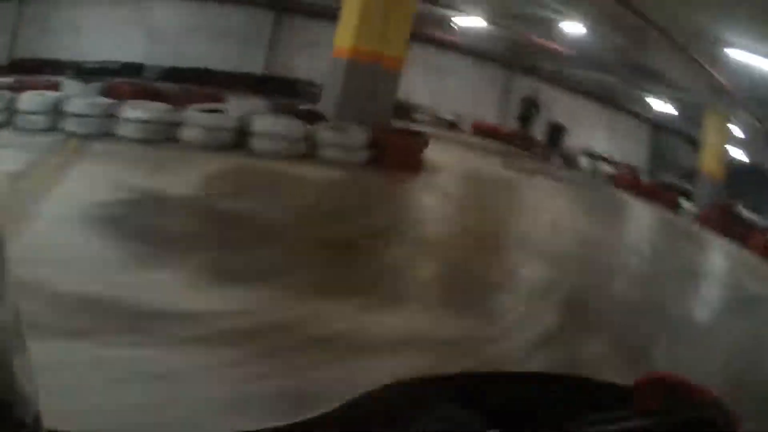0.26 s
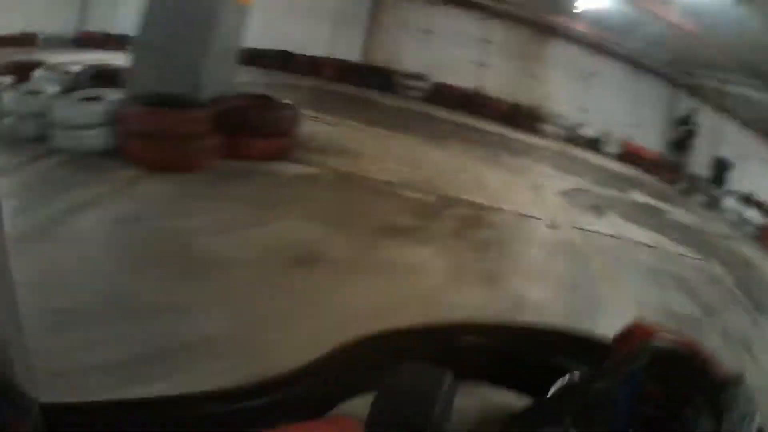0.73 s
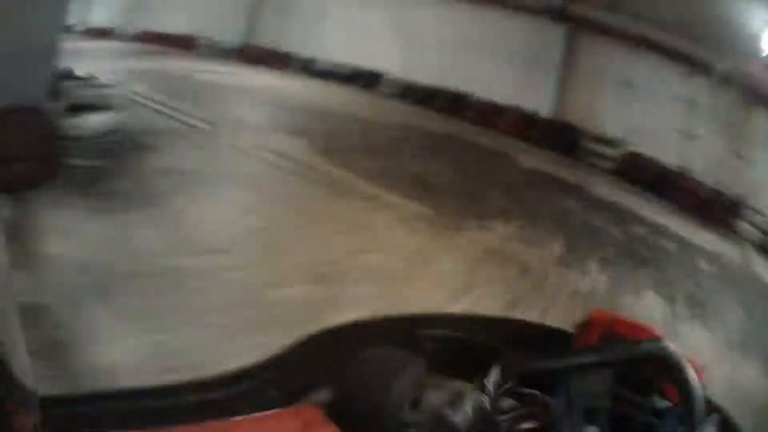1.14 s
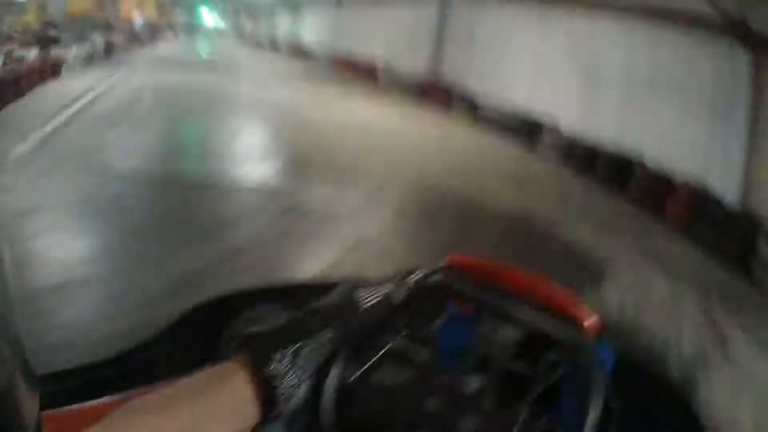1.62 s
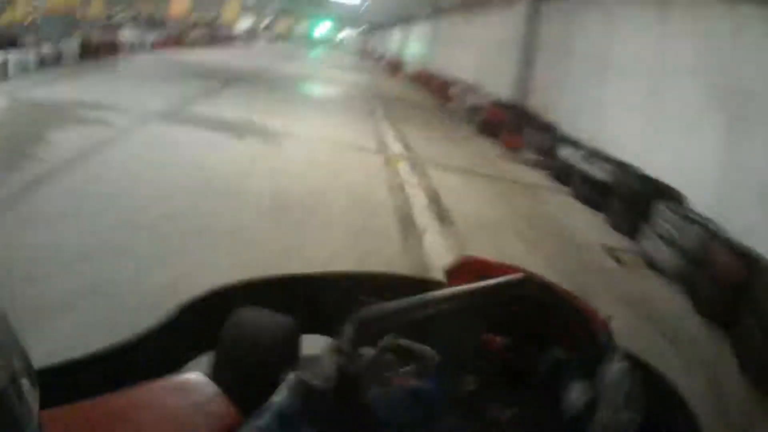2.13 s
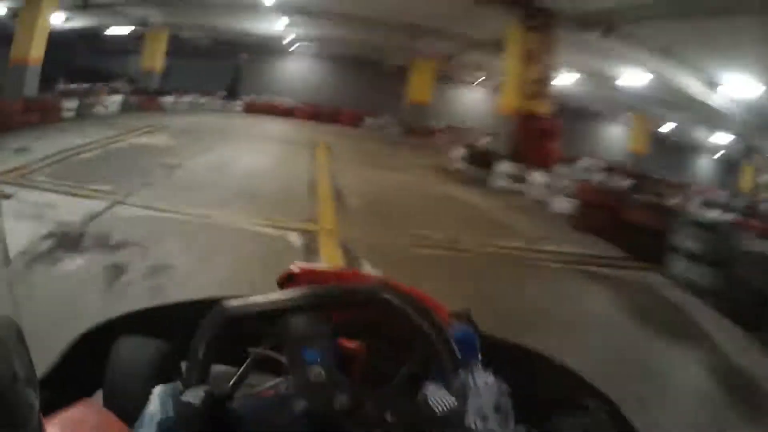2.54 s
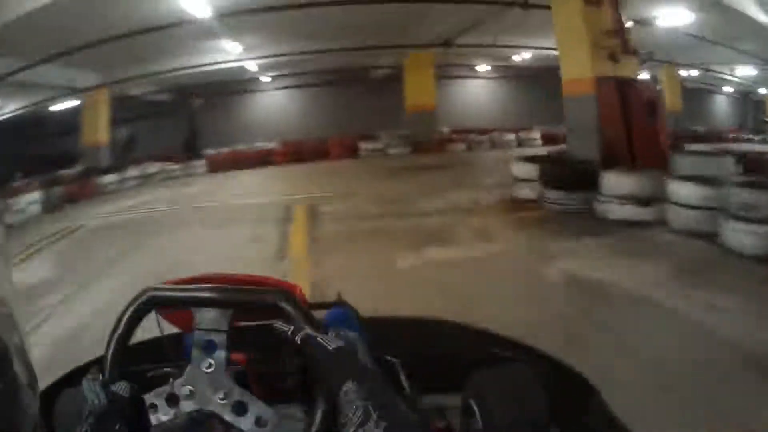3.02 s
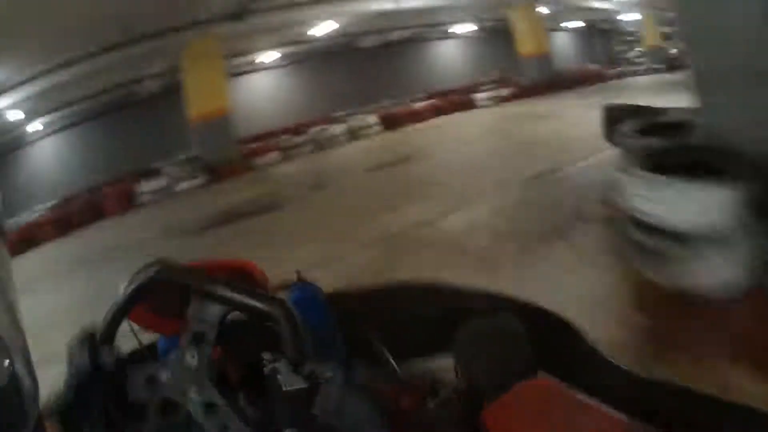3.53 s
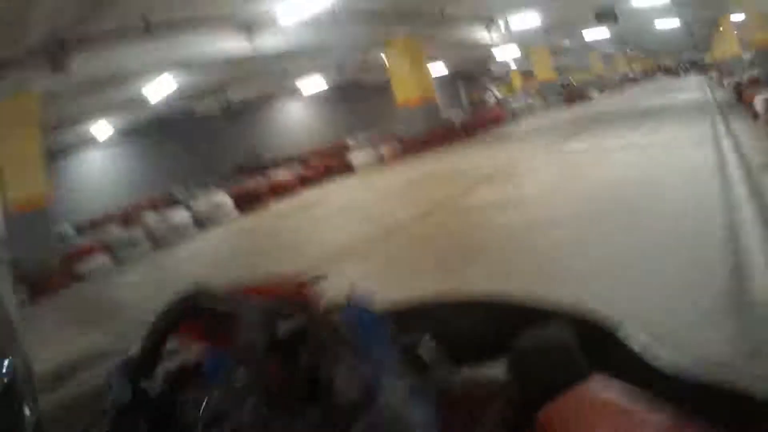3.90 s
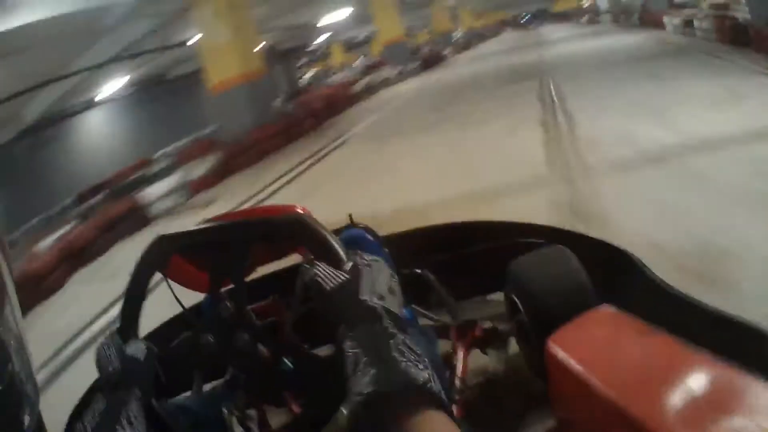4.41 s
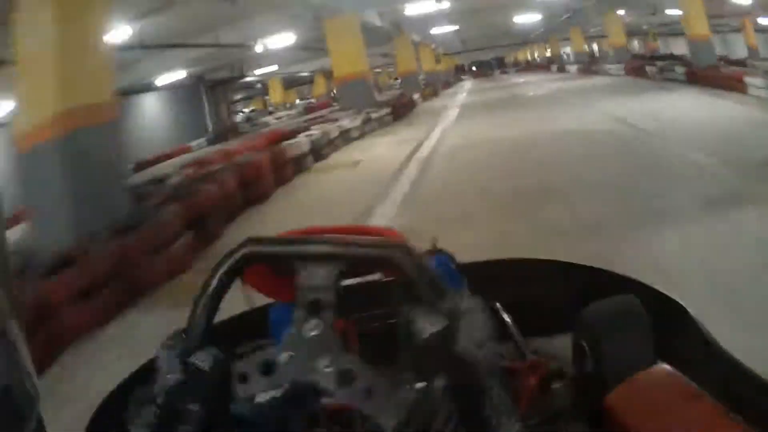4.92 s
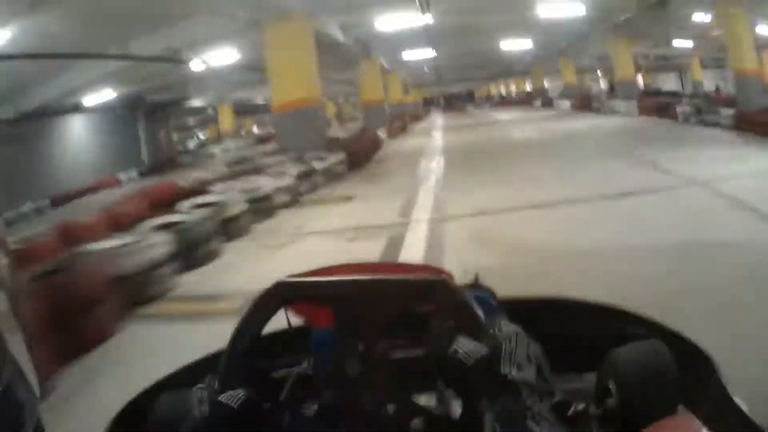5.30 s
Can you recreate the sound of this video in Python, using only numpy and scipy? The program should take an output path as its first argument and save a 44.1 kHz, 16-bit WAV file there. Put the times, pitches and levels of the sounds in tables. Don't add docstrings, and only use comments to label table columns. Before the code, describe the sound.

A small single-cylinder kart engine, heard through a sealed plastic case on the driver's helmet, throbs slowly round an indoor hairpin with a loose panel buzzing, then picks up slightly. After an abrupt cut it is much louder and faster, a rough nasal drone with mount ticks; braking brings tyre scrub, hard rattles and a falling pitch.

```python
import sys
import numpy as np
from scipy import signal
from scipy.fft import rfft, irfft
from scipy.io import wavfile
from scipy.ndimage import uniform_filter1d, minimum_filter1d

SR = 44100
rng = np.random.default_rng(int(sys.argv[2]) if len(sys.argv) > 2 else 0)


def store_wav(level_fs):
    pcm = np.round(np.clip(np.atleast_2d(level_fs), -1, 1) * 32767)
    wavfile.write(sys.argv[1], SR, pcm.T.astype(np.int16))


def invert_db(level):
    return 10 ** (np.asarray(level, dtype=float) / 20)


N = 244755
TIME = np.arange(N) / SR
FILTER_HZ = np.linspace(1, SR / 2, 4097)
CUT_S = 2.5025


# (frequency [Hz], width [Hz], level [dB])
RING_MODES = [(1453.4, 58.5, -4), (1503.4, 61, 1), (1564, 96.4, -5.5)]
# (frequency [Hz], width [Hz], level [dB])
SHELL_MODES = [(3016, 150, 0), (3345, 202, 0)]


def engine():
    turns = crank()
    exhaust_db, boom_db, ring_db, shell_db, hiss_db = levels()
    force = 1 + 0.15 * rng.standard_normal(200)
    crack = cracks(turns, force, lead=.13)

    exhaust = puffs(turns, force, share=0.92, lead=0.33, grain_db=1.7, flicker_db=0.86) + crack
    exhaust = causal_filter(exhaust, case_db(1308, 4090))
    boom = puffs(turns, force, share=0.85, lead=0.32, grain_db=2.2, flicker_db=0.23) + invert_db(7.0) * crack
    boom = causal_filter(boom, case_db(10, 1247))
    hiss = puffs(turns, force, share=0.21, lead=0.45, grain_db=3.9, flicker_db=1.3) + invert_db(6.0) * crack
    hiss = causal_filter(hiss, case_db(3777, 21000))

    ring = puffs(turns, force, share=0.66, lead=0.38, grain_db=2.0, flicker_db=0.79) + invert_db(5.5) * crack
    ring = modes(ring, RING_MODES, wander_db=1.2)
    shell = puffs(turns, force, share=0.34, lead=0.09, grain_db=3.9, flicker_db=2.8) + invert_db(-3.0) * crack
    shell = modes(shell, SHELL_MODES)

    leaked = invert_db(exhaust_db + 0.4) * rms_one(exhaust) + invert_db(boom_db + 0.64) * rms_one(boom)
    leaked = leaked + invert_db(hiss_db + 3.0) * rms_one(hiss)
    shaken = invert_db(ring_db + 0.56) * ring + invert_db(shell_db - 3.5) * shell
    return leaked + shaken + tones(turns)


# (time [s], firing rate [firings per s])
SPEED = [
    (0, 19.21),
    (.7, 19.08),
    (1.25, 19.16),
    (2.5024, 21.96),
    (2.5025, 31.84),
    (2.9, 31.99),
    (3.95, 30.13),
    (4.1, 27.5),
    (4.75, 21.52),
    (5.55, 20.23),
]


def firing_rate():
    return in_time(SPEED)[0]


def crank():
    return -.07 + np.cumsum(firing_rate()) / SR


def steadiness():
    accel = np.clip(np.gradient(firing_rate()) * SR, -12, 3)
    return 1.1 * uniform_filter1d(accel, size=8001)


# (time [s], throb depth [dB])
THROB = [(0, 7), (2.2, 6.5), (2.5, -0.5), (3.8, 2.5), (4.6, -0.5), (4.9, 3), (5.55, -2)]


def throb_db():
    return in_time(THROB)[0]


def puffs(turns, force, share, lead, grain_db, flicker_db):
    phase = (turns + lead) % 1
    firing = (turns + lead).astype(int)
    swell = np.sin(np.pi * np.sqrt(phase)) ** 2 - .5
    grains = invert_db(grain_db * np.minimum(rng.exponential(1, N), 5)) * rng.standard_normal(N)
    depth_db = share * throb_db() * force[firing]
    return rms_one(grains * invert_db(depth_db * swell + flicker_db * drift(13)))


def cracks(turns, force, lead):
    firing = np.floor(turns + lead)
    fired = np.diff(firing, prepend=0) > 0
    return fired * invert_db(2.94 * throb_db()) * np.abs(force[(turns + lead).astype(int)])


# (time [s], exhaust level [dB])
LOAD = [(0, -37), (1.1, -37.5), (1.7, -37), (2.1, -36), (2.35, -38), (2.502, -36.5), (2.503, -32),
        (2.85, -32.5), (3.2, -33), (3.7, -33.5), (4.05, -32.5), (4.45, -37), (4.75, -34.5), (4.92, -36),
        (5.3, -35.5), (5.55, -37.5)]
# (time [s], length [s], ring swell [dB], shell swell [dB])
JOLTS = [(.1, 0.051, 4.5, -1), (.43, 0.084, 3.5, 2), (1.27, 0.21, 7.5, 1.5), (1.77, 0.092, -1, 2.5),
         (1.98, 0.053, 2, 0), (2.17, 0.1, 5, 2), (2.57, 0.063, 6, 7.5), (2.73, 0.047, 7, -1.5),
         (2.94, 0.086, 5, 8.5), (3.16, 0.18, 5, 4.5), (3.34, 0.062, 4.5, -0.5), (3.335, .02, 3, 4),
         (3.5, 0.21, 3.5, 3), (3.82, 0.042, 3, 2.5), (3.93, 0.048, 6.5, 4.5), (4.09, 0.027, 5.5, -3.5),
         (4.23, 0.083, 9, 2.5), (4.34, .08, 8, 3.5), (4.41, 0.14, 15.5, 8), (4.48, 0.093, 3.5, 1.5),
         (4.57, .15, 9, 7.5), (4.66, .1, 0.5, -0.5), (4.75, 0.1, 7, 3), (4.95, 0.18, 5, 1),
         (5.07, 0.055, 1, 4.5), (5.2, 0.054, 9.5, 5), (5.33, 0.12, 10, 0.5)]


def levels():
    exhaust_db, = in_time(LOAD)
    extra_load = exhaust_db + 37
    boom_db = -49 + 1.16 * extra_load
    hiss_db = -60 + .9 * extra_load
    ring_db = -41.5 + 2.03 * extra_load
    shell_db = -49.5 + 1.63 * extra_load

    ring_jolt, shell_jolt = bumps(JOLTS)
    start, end, edge = 3.76, 4.8, 0.11
    rattle_db, after_db = 7, 2
    corner_db, = in_time([(start - edge, 0), (start, rattle_db), (end - edge, rattle_db), (end, after_db)])
    shaken_shell_db = shell_db + shell_jolt + corner_db
    return exhaust_db, boom_db, ring_db + ring_jolt, shaken_shell_db, hiss_db + .25 * shell_jolt


# (multiple of the firing rate, slow level [dB], fast level [dB])
ORDER_TONES = [(8, -91, -94), (9, -93, -95), (10, -95, -77), (11, -88, -74), (14, -95, -67), (15, -81, -90),
               (17, -95, -74), (18, -78, -85), (20, -86, -72), (21, -77, -75), (22, -78, -87),
               (23, -77, -72), (24, -79, -74), (25, -78, -77), (26, -78, -87), (28, -76, -64),
               (29, -79, -70), (30, -95, -64), (32, -77, -74), (36, -78, -72)]


def tones(turns):
    fast = np.clip((np.gradient(turns) * SR - 23) / 6, 0, 1)
    starts = rng.random(len(ORDER_TONES))
    lines = np.zeros(N)
    for (order, slow_db, fast_db), start in zip(ORDER_TONES, starts):
        level_db = slow_db + fast * (fast_db - slow_db) + 1.5 * drift(2.7)
        lines += invert_db(level_db) * np.sin(2 * np.pi * (order * turns + start))
    return invert_db(steadiness() + 2.5 + 2.5 * fast) * lines


# (frequency [Hz], gain [dB])
CASE = [(25, -55.5), (50, -55), (140, -51), (320, -38.5), (420, -32.5), (800, -27), (1250, -17.5),
        (1750, -7.5), (2300, -10.5), (3300, -17.5), (3800, -32.5), (5200, -38.5), (7100, -53), (15000, -76)]
# (frequency [Hz], width [Hz], boost [dB])
CASE_MODES = [(440, 25, 3), (730, 32, 2.5), (911, 71, 6.5), (1118, 64, 5.5), (1730, 130, -3),
              (2075, 140, 5), (2520, 53, 2), (4724, 110, 6), (5640, 260, 7.5), (7060, 370, 1),
              (9200, 460, 3), (10360, 820, 5.5)]


def case_db(low_hz, high_hz):
    case_hz, case_gain = np.transpose(CASE)
    gain_db = np.interp(np.log(FILTER_HZ), np.log(case_hz), case_gain)
    for centre_hz, width, boost_db in CASE_MODES:
        gain_db = gain_db + boost_db * np.exp(-.5 * ((FILTER_HZ - centre_hz) / (width / 2)) ** 2)
    low_edge = 1 + (low_hz / FILTER_HZ) ** 12
    high_edge = 1 + (FILTER_HZ / high_hz) ** 12
    return gain_db - 10 * np.log10(low_edge * high_edge)


# (frequency [Hz], width [Hz], level [dB])
BUZZ_MODES = [(2453, 200, 1), (4380, 260, -24.5)]
# (time [s], length [s], level [dB])
BUZZES = [
    (.15, 0.4, -47),
    (0.601, 0.56, -43.5),
]


def panel():
    swell, = bumps([(s, length, invert_db(level_db)) for s, length, level_db in BUZZES])
    shaking = puffs(crank(), np.ones(200), share=1.7, lead=.3, grain_db=2.8, flicker_db=1.0)
    return swell * modes(shaking, BUZZ_MODES)


# (time [s], length [s], level [dB])
SCRUBS = [(2.94, 0.05, -81), (3.255, 0.058, -79), (3.823, 0.051, -69.5), (3.976, .14, -72),
          (4.17, 0.12, -67.5), (4.364, 0.083, -69), (4.532, 0.14, -68), (4.66, 0.13, -71),
          (4.789, 0.13, -72), (5.18, .06, -75.5)]


def tyres():
    rubber_modes = [(6170, 600, 1), (7150, 400, 1), (7600, 160, -2.5), (10400, 1000, -14.0)]   # Hz, Hz, dB
    scrub = modes(rng.standard_normal(N) * invert_db(5.3 * drift(30)), rubber_modes)
    patches, = bumps([(s, length, invert_db(level_db)) for s, length, level_db in SCRUBS])
    rolling = invert_db(-83.5) * (TIME > CUT_S) * (TIME < 3.6)
    return (patches + rolling) * scrub


# (time [s], peak level [dB])
TICKS = [(2.5671, -63), (2.6623, -69), (2.8918, -62), (2.9113, -65), (2.9442, -64), (3.1642, -67),
         (3.1946, -69), (3.4506, -70), (3.6795, -69), (4.3585, -65), (4.3814, -57), (4.3874, -58),
         (4.3974, -57), (4.4014, -66), (4.4144, -67), (4.4204, -61), (4.4314, -69), (4.6833, -69),
         (4.8718, -72), (4.9187, -72), (5.0135, -71)]


def ticks():
    clicks = np.zeros(N)
    for s, peak_db in TICKS:
        clicks[round(s * SR)] = invert_db(peak_db + 3.5)
    fade = np.exp(-1 / (0.0011 * SR))
    burst = signal.lfilter([1], [1, -fade], clicks + 1e-18) * rng.choice([-1, 1], N)
    tilt_db = -13 * np.log2(np.maximum(FILTER_HZ / 9000, .3))
    edges_db = -10 * np.log10(1 + (FILTER_HZ / 11500) ** 9 + (250 / FILTER_HZ) ** 3)
    return causal_filter(burst, tilt_db + edges_db)


# (time [s], step level [dB])
SPLICES = [
    (0, -31),
    (CUT_S, -24),
]


def splices():
    out = np.zeros(N)
    for s, step_db in SPLICES:
        t = TIME - s
        out -= invert_db(step_db) * (t >= 0) * np.cos(2 * np.pi * 1500 * t) * np.exp(-np.maximum(t, 0) / .005)
    return out


def port(x):
    centre_hz, width_hz, depth_db = 7930, 520, -19.5
    return causal_filter(x, depth_db * np.exp(-.5 * ((FILTER_HZ - centre_hz) / (width_hz / 2)) ** 2))


def limiter(x, top):
    gain = np.minimum(1, top / (np.abs(x) + 1e-9))
    return x * uniform_filter1d(minimum_filter1d(gain, size=161), size=161)


def modes(drive, table, wander_db=0):
    total = np.zeros(N)
    for k, (hz, width, level_db) in enumerate(table):
        ringing = resonate(resonate(drive, hz, 1.7 * width), hz, 1.7 * width)
        total += invert_db(level_db + wander_db * drift(3)) * (-1) ** k * ringing
    return rms_one(total)


def resonate(x, hz, width):
    r = np.exp(-np.pi * width / SR)
    feedback = [1, -2 * r * np.cos(2 * np.pi * hz / SR), r * r]
    return signal.lfilter(np.array([1, 0, -1]) * (1 - r * r) / 2, feedback, x)


def causal_filter(x, gain_db):
    cepstrum = irfft(gain_db * np.log(10) / 20)
    cepstrum[1:4096] *= 2
    cepstrum[4097:] = 0
    response = irfft(np.exp(rfft(cepstrum)))[:4096]
    return signal.oaconvolve(x, response)[:N]


def bumps(rows):
    t = np.arange(0, N + 64, 64) / SR
    s, length, *strengths = np.transpose(rows)
    bell = np.exp(-4 * np.log(2) * ((t[:, None] - s) / length) ** 2)
    return [np.interp(TIME, t, bell @ strength) for strength in strengths]


def drift(rate):
    r = np.exp(-80 * np.pi * rate / SR)
    slow = signal.lfilter([1], [1, -2 * r, r * r], rng.standard_normal(N // 40 + 2002))[2000:]
    return np.interp(np.arange(N) / 40, np.arange(len(slow)), rms_one(slow))


def in_time(rows):
    s, *columns = np.transpose(rows)
    return [np.interp(TIME, s, column) for column in columns]


def rms_one(x):
    return x / np.sqrt(np.mean(x ** 2) + 1e-20)


def scene():
    heard = port(engine() + tyres() + ticks() + panel())
    return (limiter(heard, top=0.21) + splices())[None]


def band_limit(x):
    return signal.sosfilt(signal.butter(12, 15750, fs=SR, output="sos"), x)


def record(dry):
    return band_limit(dry)


dry = scene()
out = record(dry)
store_wav(out)
```